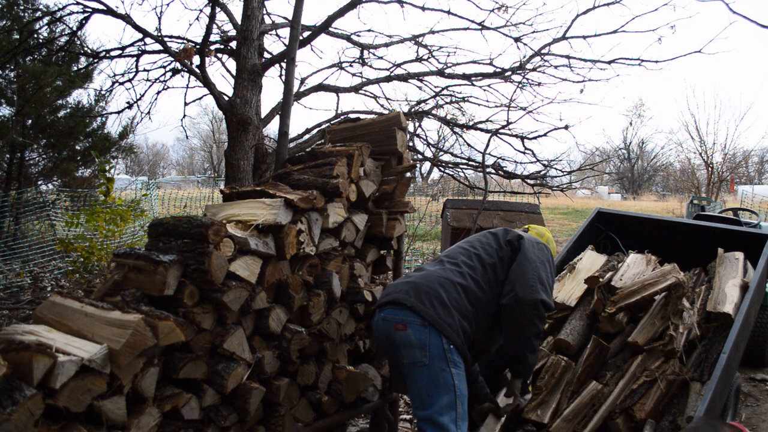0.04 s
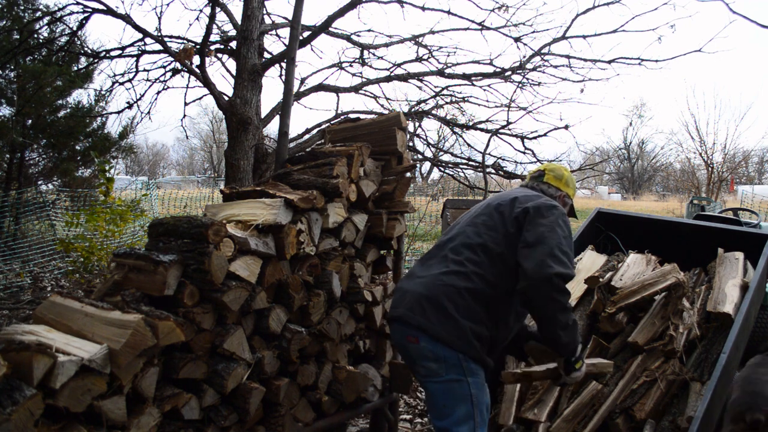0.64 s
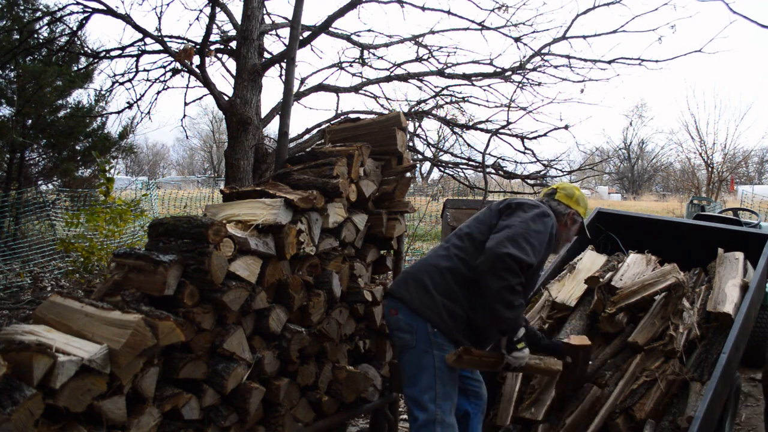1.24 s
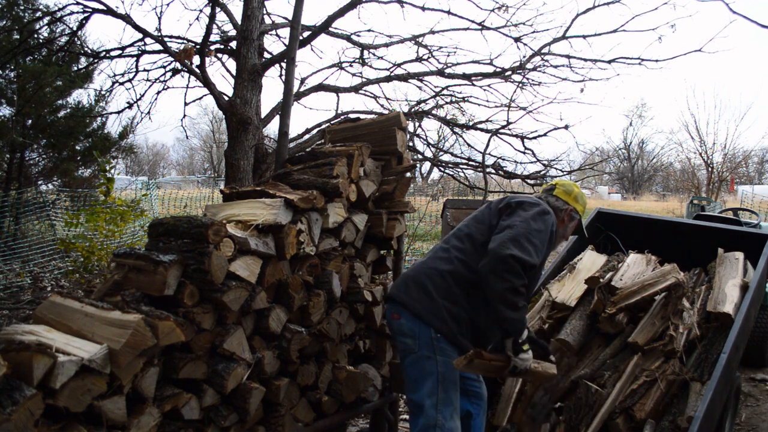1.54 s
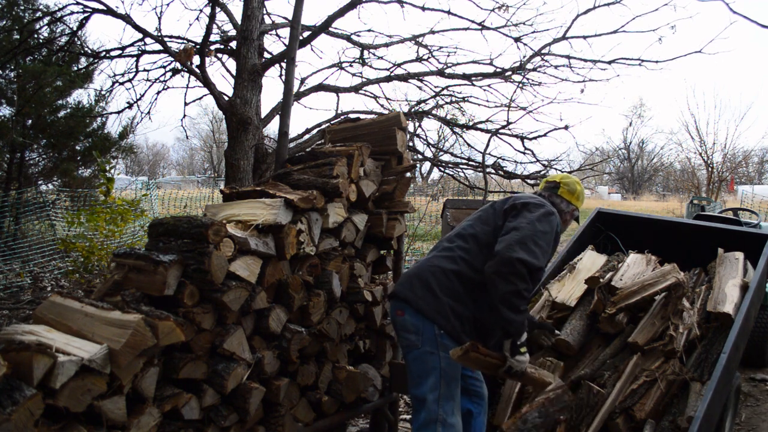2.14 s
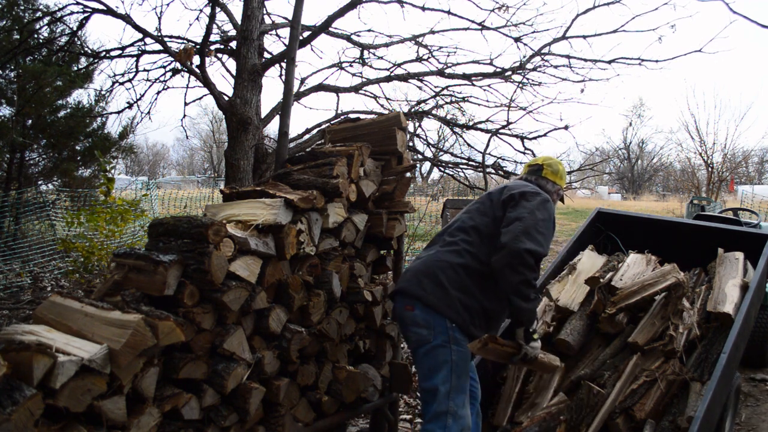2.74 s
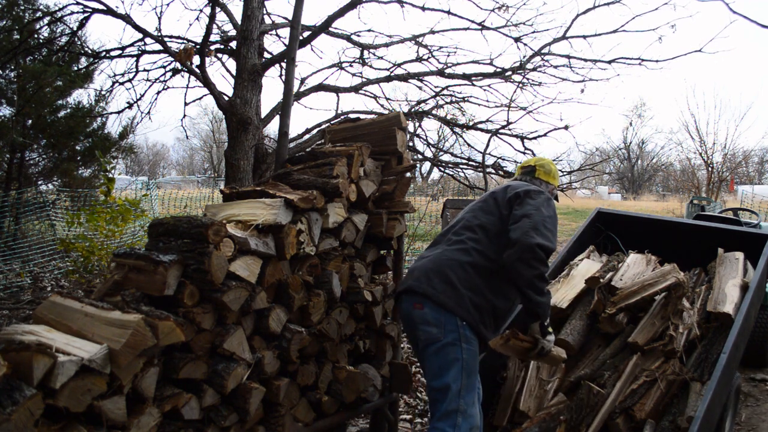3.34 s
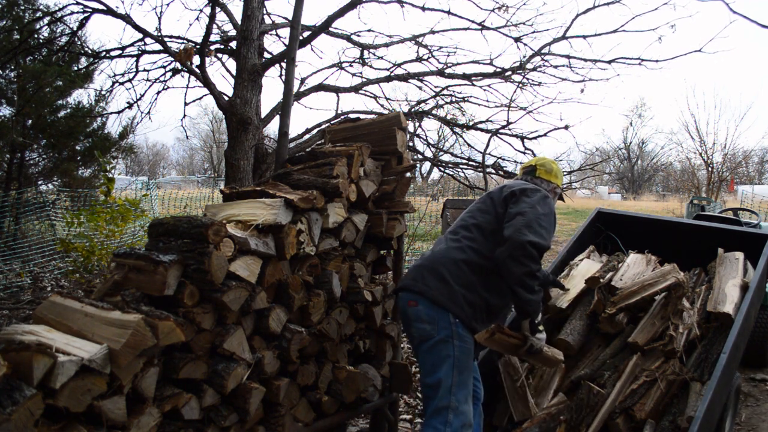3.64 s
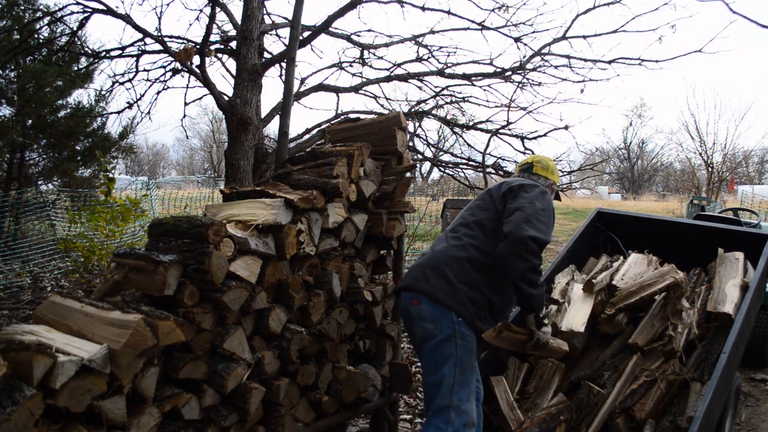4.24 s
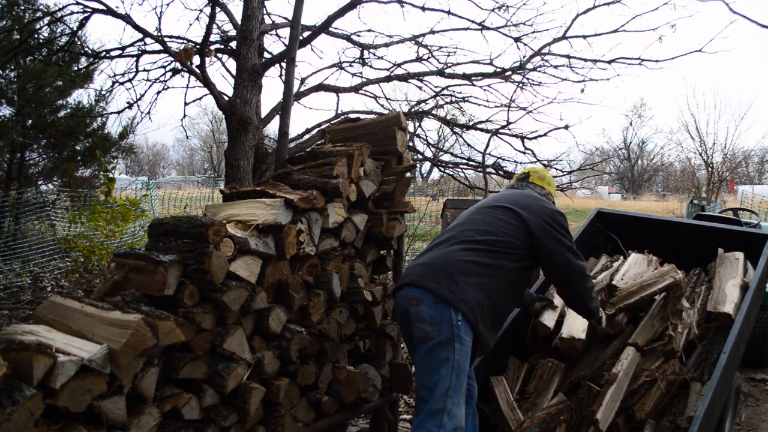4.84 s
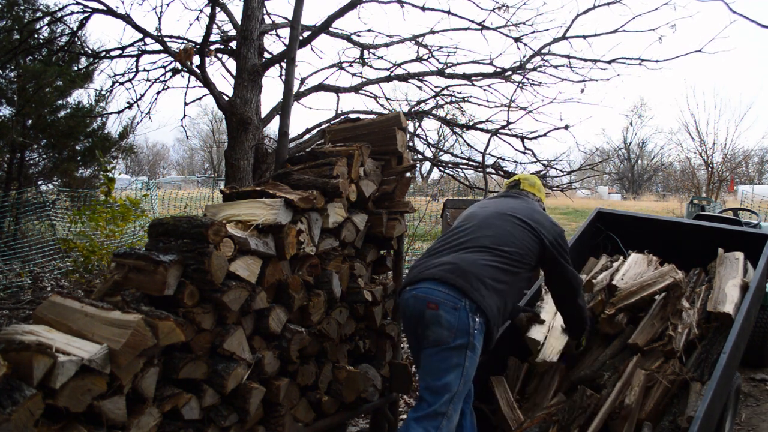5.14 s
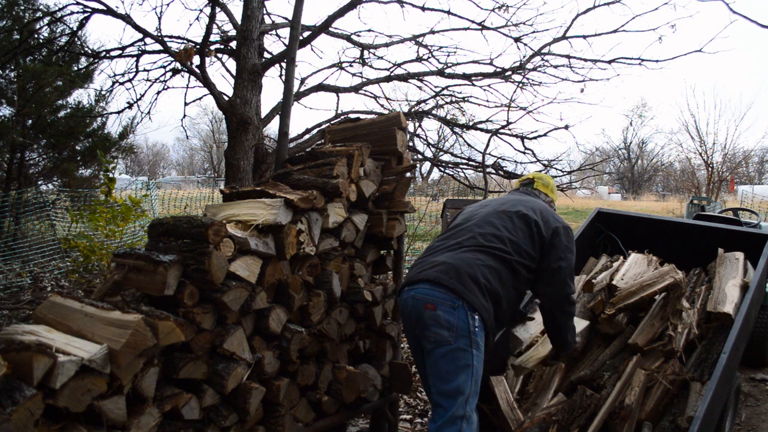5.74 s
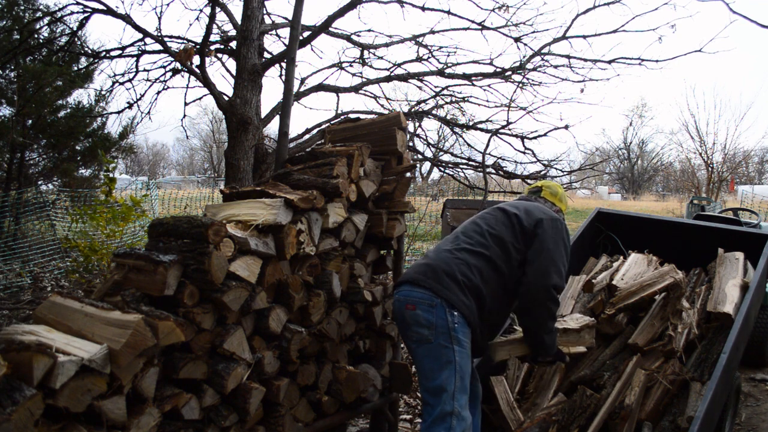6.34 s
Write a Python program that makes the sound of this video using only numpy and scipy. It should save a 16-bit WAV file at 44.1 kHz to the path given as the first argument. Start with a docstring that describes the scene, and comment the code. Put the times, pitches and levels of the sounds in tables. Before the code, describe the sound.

Split firewood is being picked out of a steel cart outdoors. Light scrapes of bark, small knocks and a faint squeak come first, then a dull thud that rings the cart bed a little. Sharp, dry clacks follow as logs hit each other, the loudest with a heavy clunk near the end, trailed by rasping and small splinter snaps. The wood sounds close, with slight echo over soft, even air.

```python
"""A scrape of bark and a few dull knocks: split firewood is being picked out of a tipped steel cart.
Logs drop and rock to rest with thuds that set the cart bed ringing, and hit each other with dry clacks.
Sliding bark catches and slips in a jerky rasp, splinters snap, and one dragged log squeaks faintly.
The woodpile and the yard throw back a little echo over a soft, even bed of outdoor air."""
import sys
import numpy as np
from scipy import signal
from scipy.fft import rfft, irfft, next_fast_len
from scipy.io import wavfile

SR = 44100
rng = np.random.default_rng(int(sys.argv[2]) if len(sys.argv) > 2 else 0)


def materialize(psi):
    """Save the field psi as 16-bit PCM at rate SR to the path in sys.argv[1].

    A 1-D psi becomes a single channel; in a 2-D psi each row is a channel.
    """
    bounded = np.clip(np.atleast_2d(psi).T, -1, 1)
    quanta = np.round(bounded * 32767).astype(np.int16)
    wavfile.write(sys.argv[1], SR, quanta)


N = 286650
TIME = np.arange(N) / SR
AGE, BRIEF = TIME[:32768], TIME[:4096]   # seconds since a heavy blow, since a light one
CUTOFF_HZ = 16000

# noise colours: f/Hz, relative level/dB
AIR_COLOUR = [(12, -27), (20, -2.5), (130, -1), (241, -5), (542, -11.5), (660, -13), (802, -14),
              (1090, -14.5), (1760, -15), (2020, -19), (2820, -21.5), (4300, -22.5), (4810, -22.5),
              (6010, -28.5), (16000, -32.5)]   # open air
RASP_COLOUR = [(300, 0), (700, -1.5), (1000, 1), (1300, 0), (1700, -1), (2300, -10.5), (3200, -13),
               (5000, -35)]   # the body of a scrape
HISS_COLOUR = [(1800, -10), (3200, -1.5), (4600, -2.5), (6000, -11), (9500, -9), (12000, -23.5),
               (16000, -23)]   # its bright top
CRACK_COLOUR = [(700, 3.5), (1500, 8), (4200, 0.5), (5800, -16.5), (8500, -9), (11500, -18.5), (16000, -38)]   # wood struck or breaking
JOSTLE_COLOUR = [(50, -22), (90, -6), (200, 22.5), (280, -5), (450, 2.5), (900, 2.5), (1500, -5.5),
                 (2100, -13.5), (4200, -20), (5500, -30), (8500, -31), (12000, -39), (16000, -64)]   # the load shifting under a blow
# bark and splinters snapping: t/s, peak/dB, resonance f/Hz
SPLINTER_SNAPS = [(0.023, -38, 3840), (0.4794, -31.5, 2700), (1.0296, -32, 3700), (2.295, -27.5, 5100),
                  (2.7544, -29, 3370), (3.975, -23.5, 3120), (4.089, -40, 4040), (4.9902, -23.5, 3700),
                  (5.4185, -27, 3170), (5.553, -26, 4240), (5.6506, -23, 6100), (5.933, -32, 4200)]
# logs sliding over each other: t/s, length/s, starting rasp level/dB, swell with speed/(dB/s),
# hiss over rasp/dB, resonance f/Hz, jerkiness/0-1
LOG_SLIDES = [(0.0, .27, -45, -19, -7, 1430, 0.64), (0.307, 0.54, -50.5, 10, -14, 1710, 0),
              (1.014, 0.21, -48, 0, -3, 1790, 0.54), (1.208, 0.062, -39, 0, -3, 1670, .1),
              (1.256, .22, -37, -24, -7, 1680, 0), (2.099, 0.073, -52, -20, 1, 1700, .1),
              (2.715, 0.33, -41, 1.5, -11.5, 1005, 0.74), (3.139, 0.11, -44.5, -15, 0.5, 1330, 0.36),
              (3.871, .47, -33.5, -18.5, -7.5, 1440, 0.15), (4.729, 0.25, -47, 17, -6, 1300, 0.42),
              (5.082, 0.63, -39, -16.5, -4.5, 1452, .2), (5.873, 0.19, -41.5, -12, -3.5, 1000, 0),
              (6.428, 0.25, -45.5, 0, -12, 1700, 0)]
# modes of a split log: multiple of its pitch, level/dB, t60/s
LOG_MODES = [(1.001, -6, 0.024), (1.1, -43, 0.0068), (1.253, -7, 0.021), (1.45, -8.5, 0.014),
             (1.879, -8.5, 0.011), (2.241, -20, 0.02), (2.85, -4, 0.0027), (4.2, -29, 0.0075),
             (5.2, -26.5, 0.004)]
# wood knocking on wood: t/s, peak/dB, pitch f/Hz, overtone tilt/(dB/octave)
LOG_KNOCKS = [(0.068, -28.5, 1490, 2), (0.29, -29, 1704, 4), (0.534, -25, 1580, -7), (0.709, -28, 860, -10),
              (0.76, -24, 1732, 14), (1.099, -35, 1510, 11), (1.269, -23.5, 1660, -5),
              (1.430, -22, 1030, -9), (1.439, -22.5, 1510, -15), (1.505, -27, 1710, 10),
              (2.11, -24, 1697, 15), (2.914, -33, 1010, -24), (3.001, -22.5, 1343, 8),
              (3.069, -4, 1734, 11), (3.0724, -13, 1694, 0), (3.99, -9.5, 988, -19),
              (3.992, -7, 1590, -5.5), (4.79, -32, 1280, -3), (4.825, -33, 1330, 8),
              (5.026, 5.5, 1375, -7.5), (5.168, -16.5, 1310, -10), (5.987, -29.5, 950, -8),
              (6.471, -27, 1765, 10)]
# modes of the loaded cart bed: f/Hz, level/dB, lingering t60/s
CART_MODES = [(67.4, -4.5, 0.9), (108.9, 2.5, 1), (153.3, 0, 1.0), (168.8, -13.5, 0.97), (195, -9.5, 0.093),
              (225.8, -2.5, 0.45), (247.6, -6, 1.0), (255.3, -3, 1), (286, 1.5, 0.76), (317.3, -1, 0.071),
              (352, -9, 0.48), (428.7, -5.5, 0.27), (482, -15, 0.94), (490.5, -12.5, 1), (523, -9, 0.18),
              (587, -14, 0.98), (631.6, -21.5, 0.2), (699, -32.5, 0.13), (836.4, -17, 0.052),
              (974, -20.5, 0.19), (981, -15.5, 0.45), (1183, -19, 0.15), (1273, -20, 1),
              (1323, -43.5, 0.34), (1487, -32, 0.37), (1514, -31, 0.69)]
# edges of a thud's four registers (boom, body, knock, crunch): f/Hz
REGISTER_EDGES = [54, 180, 600, 1800, 16000]
# logs landing in the cart: t/s, body level/dB, boom over body/dB, knock over body/dB,
# bark crunch over body/dB, gap between touches/s, pitch of the struck spot f/Hz
LOG_LANDINGS = [(0.001, -37, -6.5, -12, -16.5, .022, 253), (0.13, -30.5, -8, -22, -17.5, .012, 200),
                (0.428, -29.5, -5.5, -15, -23, 0.031, 285), (0.587, -30.5, 2.5, -11.5, -24.5, 0.025, 86),
                (0.906, -28, -30, -5.5, -30, 0.027, 380), (1.279, -44, 10.5, -9, -19, 0.14, 130),
                (2.332, -18, -1.5, -9, -20.5, 0.012, 191), (3.243, -29.5, -5, -12.5, -15.5, .032, 180),
                (3.834, -23.5, 1, -11.5, -24, 0.015, 81), (3.871, -22.5, -4, -18.5, -34, .036, 108),
                (3.915, -32, 5, -2.5, -19, 0.025, 151), (4.01, -20.5, -1.5, -9.5, -24.5, .024, 78),
                (4.088, -32.5, -3.5, -28, -29, 0.053, 109.3), (4.99, -29, -8, -9, -15, .003, 327),
                (5.042, -17, -1, 1.5, -10, 0.0078, 196), (5.061, -14, -10, -12.5, -12.5, .039, 214),
                (5.31, -49, 9.5, -18, 3, 0.042, 109)]


def from_db(db):
    """Decibels to gain."""
    return 10 ** (np.asarray(db) / 20)


def rms_one(x):
    """Scale to rms 1."""
    return x / np.sqrt(np.mean(x ** 2) + 1e-20)


def fade(t60, age=AGE):
    """A decay of 60 dB in t60 seconds."""
    return np.exp(-np.log(1000) * age / max(t60, 1e-3))


def rise(seconds, age=AGE):
    """A smooth attack from 0 to 1."""
    return np.tanh((age / seconds) ** 2)


def band(x, low_hz, high_hz, order=2):
    """Causal band-pass."""
    edges = [low_hz, min(high_hz, SR / 2 - 100)]
    return signal.sosfilt(signal.butter(order, edges, "band", fs=SR, output="sos"), x)


def response(low_hz, high_hz, order):
    """A band-pass curve on the frequency bins of one heavy blow."""
    b, a = signal.butter(order, [low_hz, high_hz], "band", analog=True)
    return signal.freqs(b, a, np.fft.rfftfreq(len(AGE), 1 / SR))[1]


def coloured(x, colour):
    """EQ a steady noise to a colour; rms 1."""
    hz, db = np.transpose(colour)
    size = next_fast_len(len(x))
    bins_hz = np.maximum(np.arange(size // 2 + 1) * SR / size, 1)
    curve = from_db(np.interp(np.log(bins_hz), np.log(hz), db, left=-90, right=-90))
    return rms_one(irfft(rfft(x, size) * curve, size)[:len(x)])


def noise(colour, size):
    """Smooth noise of a given colour."""
    return coloured(rng.standard_normal(size), colour)


def drift(per_s, size):
    """A random wander through per_s points a second; rms 1."""
    knots = rng.standard_normal(4096)
    return rms_one(np.interp(TIME[:size] * per_s, np.arange(len(knots)), knots))


def add(out, at, sound):
    """Mix a sound in at a time in seconds."""
    start = max(round(at * SR), 0)
    out[start:start + len(sound)] += sound[:N - start]


def open_air(level_db=-45, waver_db=.5):
    """A soft, dark outdoor bed whose level barely wavers."""
    return from_db(level_db + waver_db * drift(5.43, N)) * noise(AIR_COLOUR, N)


def yard_echo(x, near_db=-18, far_db=-29):
    """The woodpile scatters sound back at once; trees and fences return a faint, dull tail."""
    near = band(rng.standard_normal(len(AGE)), 1260, 9300, order=1) * fade(t60=0.078) * rise(0.015)
    far = band(rng.standard_normal(len(AGE)), 230, 920, order=1) * fade(t60=0.66) * rise(0.056)
    echoes = from_db(near_db) * near / np.linalg.norm(near) + from_db(far_db) * far / np.linalg.norm(far)
    return signal.fftconvolve(x, echoes)[:N]


def squeak(peak_s=.70, peak_db=-49, pitch_hz=2930, sag_hz_per_s=1400, waver=0.0096, attack_s=0.027):
    """A dragged log sticks and slips fast enough to sing; the pitch sinks as it slows."""
    age = np.clip(TIME - peak_s, -1, 1)
    hz = (pitch_hz - sag_hz_per_s * age) * (1 + waver * drift(330, N))
    envelope = np.minimum(np.exp(age / attack_s), fade(t60=0.61, age=age))
    return from_db(peak_db) * envelope * np.sin(2 * np.pi * np.cumsum(hz) / SR)


def snaps(t60=0.012):
    """A splinter breaks with a bright tick and a narrow resonance of its own."""
    out = np.zeros(N)
    for at, peak_db, hz in SPLINTER_SNAPS:
        burst = noise(CRACK_COLOUR, len(BRIEF)) * fade(t60, BRIEF) * rise(0.0003, BRIEF)
        tick = band(burst, hz / 0.51, hz * 4, order=1)
        tick += band(burst, hz / 0.97, hz * 1.07, order=1)
        add(out, at, from_db(peak_db) * tick / np.abs(tick).max())
    return out


def grains(per_s, spread_db):
    """One second of fibre catching on fibre: random clicks, mostly small."""
    sizes = from_db(spread_db * np.minimum(rng.exponential(1, SR), 4)) * rng.choice([-1, 1], SR)
    return sizes * (rng.random(SR) < per_s / SR)


def slide_speed(age, db_per_s, jerkiness, jerks_per_s=16.94, attack_s=0.019, release_s=0.022):
    """A log gets going, gains or loses speed and stops, sticking and slipping on the way."""
    sticking = jerkiness * np.cos(np.pi * jerks_per_s * age) ** 2
    return from_db(db_per_s * age) * (1 - sticking) * rise(attack_s, age) * rise(release_s, age[::-1])


def slides(judder_db=1.5, ring_db=7, wander_db=8.7, half_width_hz=35, flake_db=-6, swell_db=1.86):
    """Bark catches and slips; the catches rasp, hiss and excite the sliding log's lowest modes."""
    out = np.zeros(N)
    for at, length_s, level_db, db_per_s, hiss_db, hz, jerkiness in LOG_SLIDES:
        size = int(length_s * SR)
        catches = grains(per_s=7000, spread_db=3) * from_db(judder_db * drift(107.7, SR))
        rasp = coloured(catches, RASP_COLOUR)
        ring = np.zeros(SR)
        for ratio, db, _ in LOG_MODES[:3]:   # the contact point wanders, so the modes take turns
            mode = band(rasp, hz * ratio - half_width_hz, hz * ratio + half_width_hz, order=1)
            ring += from_db(db + wander_db * drift(19.7, SR)) * mode
        rasp += from_db(ring_db) * ring
        flakes = grains(per_s=260, spread_db=4.5)   # bits of bark breaking off
        hiss = coloured(catches, HISS_COLOUR) + from_db(flake_db) * coloured(flakes, CRACK_COLOUR)
        stroke = rms_one(rasp[:size]) + from_db(hiss_db) * rms_one(hiss[:size])
        pressure = rms_one(from_db(swell_db * drift(29, size)))
        add(out, at, from_db(level_db) * stroke * pressure * slide_speed(TIME[:size], db_per_s, jerkiness))
    return out


def bumps(per_s=5.8, peak_db=-35, spread_octaves=.2, tilt_db=-4, tilt_spread_db=5):
    """A sliding log nudges its neighbours at random moments; yields rows like those of LOG_KNOCKS."""
    for start, length_s, *_, hz, _ in LOG_SLIDES:
        times = start + rng.uniform(0, length_s, round(per_s * length_s))
        for at in times:
            force_db, detune, edge = rng.standard_normal(3)
            pitch_hz = hz * 2 ** (spread_octaves * detune)
            if at < TIME[-1]:
                yield at, peak_db + force_db, pitch_hz, tilt_db + tilt_spread_db * edge


def clacks(contact_s=0.0027, crack_db=-9, crack_per_tilt=0.54, crack_t60=0.018):
    """Rough faces meet over a few milliseconds: a dry crack, and the log's modes ring briefly."""
    out = np.zeros(N)
    for at, peak_db, pitch_hz, tilt_db in [*LOG_KNOCKS, *bumps()]:
        ring = np.zeros(len(BRIEF))
        for k, (ratio, db, t60) in enumerate(LOG_MODES):
            gain = (-1) ** k * from_db(db + tilt_db * np.log2(ratio))
            ring += gain * np.sin(2 * np.pi * pitch_hz * ratio * BRIEF) * fade(t60, BRIEF)
        crack = noise(CRACK_COLOUR, len(BRIEF)) * fade(crack_t60, BRIEF)
        crack *= from_db(crack_db + crack_per_tilt * tilt_db)   # sharper knocks crack harder
        crack = band(crack, 0.78 * pitch_hz, CUTOFF_HZ)   # a log radiates little below its pitch
        knock = (ring + crack) * rise(contact_s, BRIEF)
        add(out, at, from_db(peak_db) * knock / np.abs(knock).max())
    return out


def touches(count=3, loss_db_per_s=205, boom_loss_db=4.5, ring_growth=1.9):
    """A log rocks to rest, lighter at each touch: t/s, register levels/dB, ring t60/s, spot f/Hz."""
    for at, body_db, boom_db, knock_db, crunch_db, gap_s, spot_hz in LOG_LANDINGS:
        first_t60 = 0.094 * (198 / spot_hz) ** 1.02   # lower, slacker spots ring longer
        for k in range(count):
            balance_db = np.array([boom_db - boom_loss_db * k, 0, knock_db, crunch_db])
            levels_db = body_db - loss_db_per_s * k * gap_s + balance_db
            t60 = first_t60 * ring_growth ** k   # the ring opens up as the log's pressure eases
            yield at + k * gap_s, levels_db, t60, spot_hz


def thuds(jostle_db=1.1, tail_db=-19, linger_db=-19, uneven_db=3, contact_s=0.0012, spot_db=-2):
    """A landing log rings the steel bed and jostles the load; weight gives boom, hardness gives knock."""
    out = np.zeros(N)
    modes = np.array([from_db(db) * np.sin(2 * np.pi * hz * AGE) for hz, db, _ in CART_MODES])
    lingering = from_db(linger_db) * modes * [fade(t60) for *_, t60 in CART_MODES]
    settling = from_db(jostle_db) * (fade(t60=0.18) + from_db(tail_db) * fade(t60=0.34))
    crossover = [response(low, high, order=3) for low, high in zip(REGISTER_EDGES, REGISTER_EDGES[1:])]
    for at, levels_db, t60, spot_hz in touches():
        strengths = from_db(uneven_db * rng.standard_normal(len(modes))) * rng.choice([-1, 1], len(modes))
        ring = strengths @ modes * fade(t60) + strengths @ lingering   # the load damps most of it fast
        jostle = settling * noise(JOSTLE_COLOUR, len(AGE))
        spectrum = rfft((ring + jostle) * rise(contact_s))
        # each spot favours a few modes and gives little far below its pitch
        spectrum *= 1 + from_db(spot_db) * response(spot_hz / 1.04, spot_hz * 1.005, order=1)
        spectrum *= response(0.35 * spot_hz, CUTOFF_HZ, order=2)
        registers = irfft(spectrum * crossover)
        registers[-1] *= fade(t60=0.23)   # wood swallows the treble first
        attack_rms = registers[:, :SR // 25].std(axis=1)   # over the first 40 ms
        add(out, at, from_db(levels_db) / attack_rms @ registers)
    return out


def scene():
    """The handled wood up front, its echo and the open air behind, in mono."""
    wood = thuds() + clacks() + snaps() + slides() + squeak()
    air = open_air()
    return (wood + yard_echo(wood) + air)[None]


def record(dry, ceiling=.93):
    """A soft clip rounds the loudest peaks and a steep low-pass trims the top."""
    rounded = dry / (1 + (dry / ceiling) ** 6) ** (1 / 6)
    return signal.sosfilt(signal.ellip(12, .1, 90, CUTOFF_HZ, fs=SR, output="sos"), rounded)


dry = scene()
out = record(dry)
materialize(out)
```